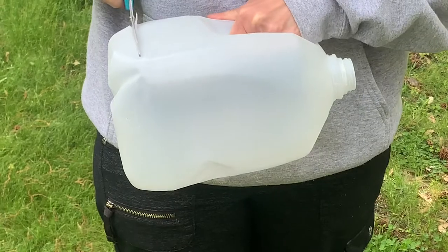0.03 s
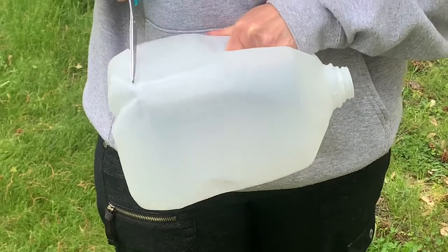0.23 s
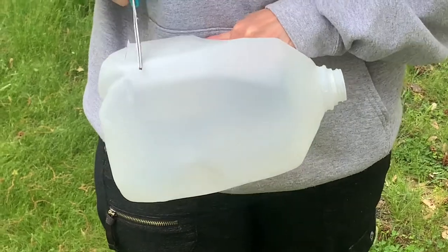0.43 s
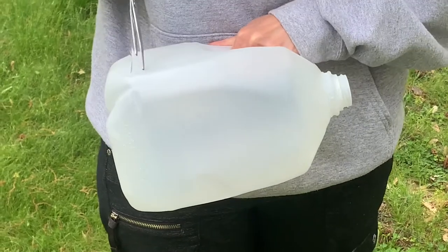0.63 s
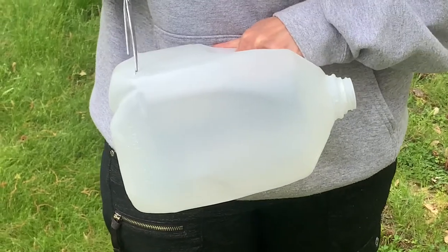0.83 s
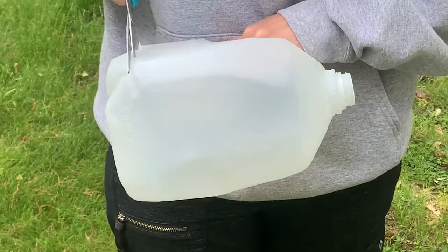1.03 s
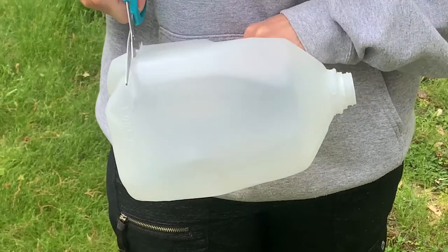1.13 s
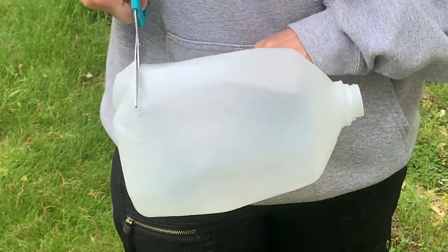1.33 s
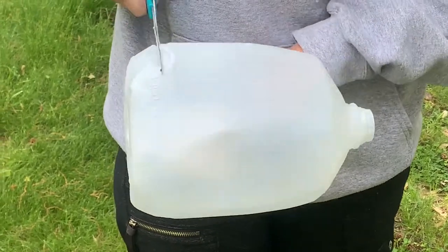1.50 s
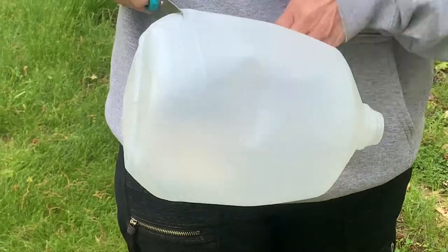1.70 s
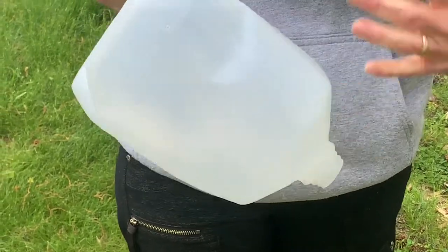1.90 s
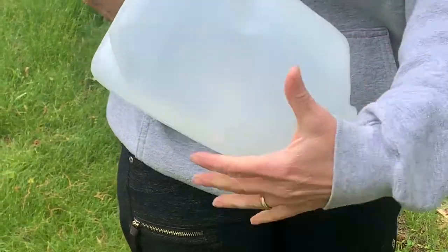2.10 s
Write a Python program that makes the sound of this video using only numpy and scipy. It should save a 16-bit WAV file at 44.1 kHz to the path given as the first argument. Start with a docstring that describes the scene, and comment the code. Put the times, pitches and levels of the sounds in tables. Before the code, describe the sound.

Scissors snip an empty plastic jug: two hard hollow snaps, then faint scrapes and small snips

```python
"""Scissors bite through an empty plastic jug, close by on a lawn: two hard snaps, then smaller snips and scrapes.
Each snip is a noise crack, decaying modes of the thin wall and a hollow thump as the wall springs back.
Between the snips blades and hands rub over the plastic: swelling strokes of noise and dense stick-slip clicks.
Behind it lie a low outdoor rumble of shaped noise and faint birds, each note a narrow band of noise.
The jug is a little left of the stereo microphone, so its sound reaches the right side later."""
import sys
import numpy as np
from scipy import signal
from scipy.fft import rfft, irfft
from scipy.io import wavfile

SR = 44100
rng = np.random.default_rng(int(sys.argv[2]) if len(sys.argv) > 2 else 0)


def materialize(psi):
    """Save the field psi as 16-bit PCM at rate SR to the path in sys.argv[1].

    A 1-D psi becomes a single channel; in a 2-D psi each row is a channel.
    """
    bounded = np.clip(np.atleast_2d(psi).T, -1, 1)
    quanta = np.round(bounded * 32767).astype(np.int16)
    wavfile.write(sys.argv[1], SR, quanta)


N = 94815  # samples
TIME = np.arange(N) / SR  # s
FREQS = np.fft.rfftfreq(N, 1 / SR)  # Hz
APART_HZ = 1860  # around and above this pitch the two microphone sides lose their likeness
RIPPLE_HZ, RIPPLE_DB = 49.54, 3  # spacing and depth of the fine resonances


def undb(db):
    """Turn decibels into gain."""
    return 10 ** (np.asarray(db) / 20)


def colour(x, points, bass_alike=0.99, ripple_db=RIPPLE_DB):
    """Give two channels a spectrum with fine resonances, alike in the bass and unrelated in the treble, at rms 1."""
    f = FREQS + 1  # keeps the logarithm finite
    hz, db = np.array(points).T
    smooth_db = np.interp(np.log(f), np.log(hz), db)
    peaks = rng.standard_normal(2000)
    ripple = ripple_db * np.interp(f / RIPPLE_HZ, np.arange(len(peaks)), peaks)
    ripple *= f / (f + APART_HZ / 2)  # shallower in the bass
    a, b = rfft(x) * undb(smooth_db + ripple)
    alike = bass_alike / (1 + (f / APART_HZ) ** 4)  # correlation of left and right
    mid = a * np.sqrt(1 + alike)
    side = b * np.sqrt(1 - alike)
    y = irfft(np.array([mid + side, mid - side]), N)
    return y / np.std(y)


def noise(points, **options):
    """Make steady stereo noise of a given spectrum."""
    return colour(rng.standard_normal((2, N)), points, **options)


def fade(age, t60):
    """Decay exponentially, by 60 dB in t60 seconds."""
    return np.exp(-np.log(1000) * age / t60)


def ring(age, modes, detune=0.0051):
    """Sum struck, decaying modes of alternating sign, shifted a little by the bend of the wall."""
    shift = 1 + detune * rng.standard_normal(len(modes))
    total = 0
    for k, (hz, db, t60) in enumerate(modes):
        wave = np.sin(2 * np.pi * hz * shift[k] * age)
        total = total + (-1) ** k * undb(db) * fade(age, t60) * wave
    return total


# Far-off rumble over the lawn. Each row: time in seconds, level in dB.
RUMBLE_LEVEL = [(0, -50.5), (.45, -51.5), (.68, -48.5), (1.28, -51), (1.55, -56.5), (2.15, -50.5)]
# Its spectrum at the microphone. Each row: frequency in Hz, relative density in dB per Hz.
RUMBLE_SPECTRUM = [(20, -33.5), (35, -13.5), (52, 4), (85, -6.5), (130, -0.5), (220, -10.5), (450, -20.5),
                   (900, -25.5), (1600, -32.5), (2300, -40.5), (5000, -51), (16000, -62.5)]


def rumble():
    """Low outdoor noise whose level drifts slowly, less alike on the two sides than the close sounds."""
    level_db = np.interp(TIME, *np.array(RUMBLE_LEVEL).T)
    return undb(level_db) * noise(RUMBLE_SPECTRUM, bass_alike=0.85, ripple_db=3.5)


# Far bird notes. Each row: time of the height in seconds, half length in seconds (to 1/e), pitch in Hz, level in dB.
BIRD_NOTES = [(0.87, 0.042, 5130, -76.5), (2.02, 0.037, 4800, -73.5), (2.048, 0.038, 3070, -64),
              (2.119, 0.024, 4920, -62.5), (2.121, 0.032, 3030, -61.5)]


def birds():
    """Blurred far notes: narrow bands of noise that swell and die in a bell shape."""
    out = np.zeros((2, N))
    width = 330  # Hz
    for height, half, hz, db in BIRD_NOTES:
        band = [(hz - 4 * width, -60), (hz - width, -5), (hz, 0), (hz + width, -5), (hz + 4 * width, -60)]
        swell = np.exp(-((TIME - height) / half) ** 2)
        out += undb(db) * swell * noise(band)
    return out


def slips(points, t60, tail_db):
    """Dense stick-slip clicks of uneven size, each with a short ring in the plastic."""
    slips_per_s, spread_db = 1300, 0.5
    size = undb(spread_db * np.minimum(rng.exponential(size=N), 5))
    happens = rng.random(N) < slips_per_s / SR
    clicks = happens * size * rng.choice([-1, 1], N)
    age = np.arange(SR // 20) / SR
    tail = undb(tail_db) * rng.standard_normal((2, len(age))) * fade(age, t60)
    response = tail + (age == 0)  # the click itself, then its tail
    return colour(signal.fftconvolve(clicks[None], response, axes=1)[:, :N], points)


# Rubbing strokes, close to the microphone. Each row: time of the height in seconds, rise and fall in seconds
# (to 1/e), then the levels of body, wall, rasp and hiss in dB.
STROKES = [(0.06, 0.55, 0.28, -61, -57, -63, -58.5), (0.188, 0.018, 0.083, -27, -29, -36.5, -49),
           (0.437, 0.088, 0.042, -33.5, -46, -51.5, -62.5), (0.531, 0.12, 0.052, -50, -46.5, -62.5, -74),
           (0.628, 0.13, 0.023, -51, -75.5, -100, -88), (0.794, 0.036, 0.035, -43, -41.5, -57, -69.5),
           (0.954, 0.014, 0.053, -37.5, -43, -57.5, -65), (1.064, .07, .065, -40.5, -46.5, -55, -60),
           (1.292, 0.042, 0.09, -43.5, -54, -68, -78), (1.384, 0.12, 0.064, -40.5, -45, -59, -58.5),
           (1.572, 0.052, 0.18, -43.5, -53.5, -80, -82), (1.672, 0.048, 0.023, -38.5, -33.5, -42, -51.5),
           (1.745, 0.086, 0.033, -51, -55.5, -69.5, -69.5),
           (2.143, 0.0073, 0.018, -46.5, -47.5, -49.5, -45)]
# Spectra of the hollow body, the wall, the rasp and the hiss of the plastic under the rub.
# Each row: frequency in Hz, relative density in dB per Hz.
RUB_BODY = [(40, -28), (100, -2.5), (150, -4.5), (210, -2.5), (300, 5.5), (370, -5), (430, -3), (560, -9),
            (1200, -57)]
RUB_WALL = [(250, -7.5), (520, -11), (680, 7), (850, 4.5), (1150, -2), (1600, -8), (2000, -13.5),
            (4000, -23.5), (9000, -53)]
RUB_RASP = [(900, -17.5), (2000, -2), (2500, 7.5), (3100, 7.5), (3700, 5), (5000, -3), (6700, 5),
            (8400, -20), (12000, -24.5)]
RUB_HISS = [(3000, -25), (6700, -7), (8400, -15), (10200, 5), (13400, -11.5), (15400, 0), (16500, -13)]


def rubbing():
    """Blades and hands drag over the jug in strokes that swell and die, the overlaps adding in power."""
    power = np.zeros((4, N))
    for height, rise, fall, *levels_db in STROKES:
        length = np.where(TIME < height, rise, fall)
        swell = np.exp(-(np.abs(TIME - height) / length) ** 1.6)
        power += (undb(levels_db)[:, None] * swell) ** 2
    body, wall, rasp, hiss = np.sqrt(power)
    out = body * noise(RUB_BODY)
    out += wall * slips(RUB_WALL, t60=0.008, tail_db=-11.5)
    out += rasp * slips(RUB_RASP, t60=0.036, tail_db=5.5)
    out += hiss * slips(RUB_HISS, t60=0.0086, tail_db=-9)
    return out


# Snips of the blades, close by. Each row: start in seconds, thump level in dB, thump pitch in Hz before detuning,
# wall ring level in dB, knock pitch in Hz before detuning, sheet ring level in dB, crack level in dB.
SNIPS = [(0.146, -41, 317, -36.5, 770, -41.5, -80), (0.163, -57, 293, -28, 1040, -39, -60),
         (0.184, -13.5, 333, -7.5, 740, -9, -1.5), (0.2051, -19.5, 213, -16, 806, -31, -8),
         (0.217, -13, 408, -19.5, 665, -23, -23), (0.2224, -6, 305, -46, 640, -36, -29),
         (0.2419, -2, 316, -2.5, 610, -6.5, -3.5), (0.3303, -23, 319, -35, 820, -30.5, -41),
         (0.337, -27, 256, -31, 785, -65, -60), (0.3827, -28.5, 212, -29.5, 785, -44, -49),
         (0.4123, -27, 208, -27.5, 830, -50, -52), (0.431, -25.5, 179, -32, 1404, -45, -58),
         (0.734, -46.5, 302, -34.5, 700, -56, -63), (0.7948, -35, 185, -24.5, 1036, -36.5, -60),
         (0.924, -36.5, 320, -40.5, 721, -59.5, -77.5), (0.9439, -23, 323.6, -30.5, 1050, -47, -35.5),
         (0.955, -24, 305.6, -47, 840, -63, -60), (1.016, -30.5, 223, -33.5, 790, -47.5, -54),
         (1.199, -45.5, 295, -43, 810, -52.5, -62), (1.234, -47, 246, -48, 700, -69, -60),
         (1.3015, -59, 278, -30.5, 1020, -41.5, -57), (1.306, -17.5, 239, -38, 800, -50, -37),
         (1.3495, -25, 271, -25, 820, -33, -30.5), (1.449, -38, 304, -34, 840, -39.5, -28.5),
         (1.487, -37, 302.5, -42.5, 790, -66, -62), (1.512, -54.5, 296, -42.5, 657, -67, -83.5),
         (1.521, -31.5, 270, -67, 673, -77, -79), (2.134, -51, 270, -37.5, 787, -49, -49)]
# Modes of the hollow jug, of its wall and of the thin sheet.
# Each row: pitch in Hz before detuning, relative level in dB, 60 dB decay in seconds.
BODY_MODES = [(215.7, -3.5, 0.12), (313.3, 1, 0.11), (416.9, -0.5, 0.089)]
WALL_MODES = [(639.2, -4.5, 0.16), (740, -12.5, 0.055), (761, -11, 0.092), (819, -8, 0.13),
              (868, -3.5, 0.096), (1316, -6, 0.074), (1330, -15, 0.054), (1503, -10.5, 0.06),
              (1537, -9, .07), (1675, -9, 0.074)]
SHEET_MODES = [(2455, -2.5, .08), (3440, 2, .11), (3450, -1.5, 0.082), (4250, -4, .09)]
# Spectra of the crack, of the crowded high modes of the sheet and of the crowded middle modes of the wall.
# Each row: frequency in Hz, relative density in dB per Hz.
CRACK = [(1000, -0.5), (3000, -2), (6000, -2.5), (8300, -12.5), (10500, 11), (13500, -6), (15500, 4.5),
         (17000, -6)]
SHEET = [(1200, -16), (2100, -11.5), (2500, 6), (3100, 0.5), (3900, 8.5), (5000, -4), (6800, 3.5),
         (8300, -10), (11500, -3), (16000, -20.5)]
CLATTER = [(200, -10.5), (520, -4), (720, 1.5), (950, -1.5), (1200, -3), (1600, -3.5), (2000, -11),
           (4000, -20), (9000, -52.5)]
# Decays by 60 dB (s), rises to 63 % (s) and relative levels (dB) of the parts of a snip.
THUMP_RISE_S, THUMP_T60_S, THUMP_DB, BODY_DB = 0.0044, 0.054, 6.5, -6
KNOCK_T60_S, KNOCK_DB, WALL_DB = 0.024, 5, -7.5
WALL_RISE_S, CLATTER_T60_S, CLATTER_DB = 0.0024, 0.074, -8
SHEET_T60_S, SHEET_DB, SHEET_MODES_DB = 0.062, -6.5, -18
CRACK_T60_S, CRACK_DB = 0.0043, -3.5
YARD_T60_S, YARD_DB = 0.2, -49  # faint echo


def snips():
    """The plastic gives way: a crack, a knock of the patch at the blade, a ringing wall, a thump and a faint echo."""
    out = np.zeros((2, N))
    crack, crowded_high, crowded_middle = noise(CRACK), noise(SHEET), noise(CLATTER)
    for start, thump_db, thump_hz, wall_db, knock_hz, sheet_db, crack_db in SNIPS:
        first = int(start * SR)
        span = slice(first, min(first + SR // 2, N))
        age = np.arange(span.stop - first) / SR
        yard = undb(YARD_DB) * fade(age, YARD_T60_S)

        flex = ring(age, [(thump_hz, THUMP_DB, THUMP_T60_S)])
        body = undb(BODY_DB) * ring(age, BODY_MODES)
        thump = (flex + body) * (1 - np.exp(-age / THUMP_RISE_S))

        knock = ring(age, [(knock_hz, KNOCK_DB, KNOCK_T60_S)])
        clatter = crowded_middle[:, span] * (undb(CLATTER_DB) * fade(age, CLATTER_T60_S) + yard)
        wall_ring = undb(WALL_DB) * ring(age, WALL_MODES)
        wall = (knock + clatter + wall_ring) * (1 - np.exp(-age / WALL_RISE_S))

        sheet = crowded_high[:, span] * (undb(SHEET_DB) * fade(age, SHEET_T60_S) + yard)
        sheet = sheet + undb(SHEET_MODES_DB) * ring(age, SHEET_MODES)
        snap = crack[:, span] * undb(CRACK_DB) * fade(age, CRACK_T60_S)

        out[:, span] += undb(thump_db) * thump + undb(wall_db) * wall
        out[:, span] += undb(sheet_db) * sheet + undb(crack_db) * snap
    return out


def scene():
    """The jug stands a little to the left, so its sound reaches the right side of the microphone later."""
    lag_s = 0.0001
    left, right = snips() + rubbing()
    right = irfft(rfft(right) * np.exp(-2j * np.pi * FREQS * lag_s), N)
    return np.array([left, right]) + rumble() + birds()


def record(dry):
    """The recorder rounds the loudest peaks and cuts the top."""
    rounded = np.tanh(dry)
    top_cut = signal.ellip(8, 0.2, 70, 15900, fs=SR, output="sos")  # low-pass: order, ripple dB, stop dB, Hz
    return signal.sosfilt(top_cut, rounded)


dry = scene()
out = record(dry)
materialize(out)
```